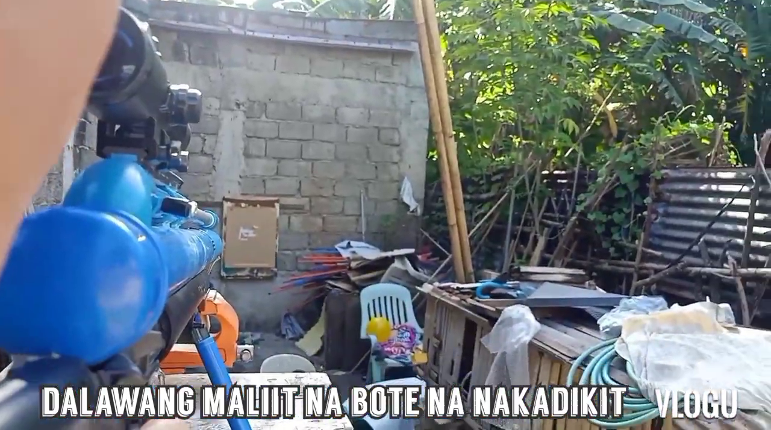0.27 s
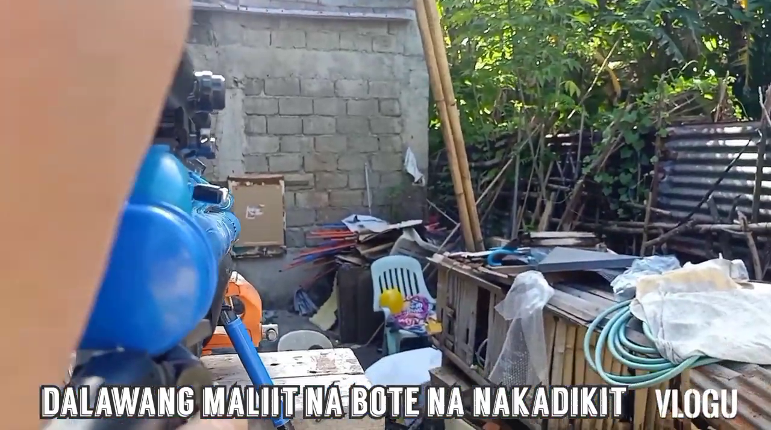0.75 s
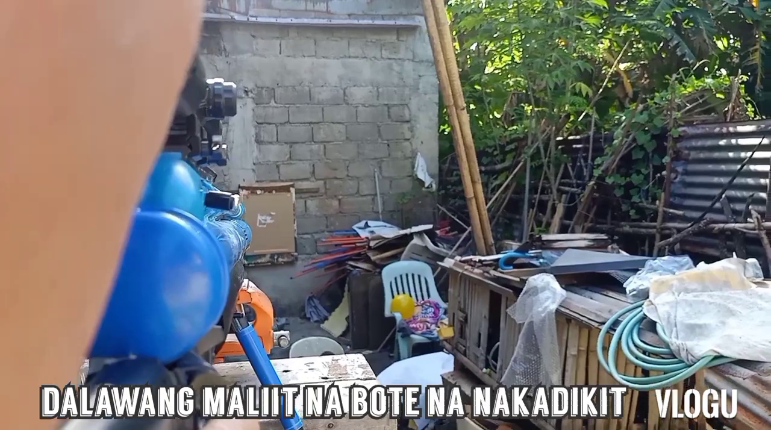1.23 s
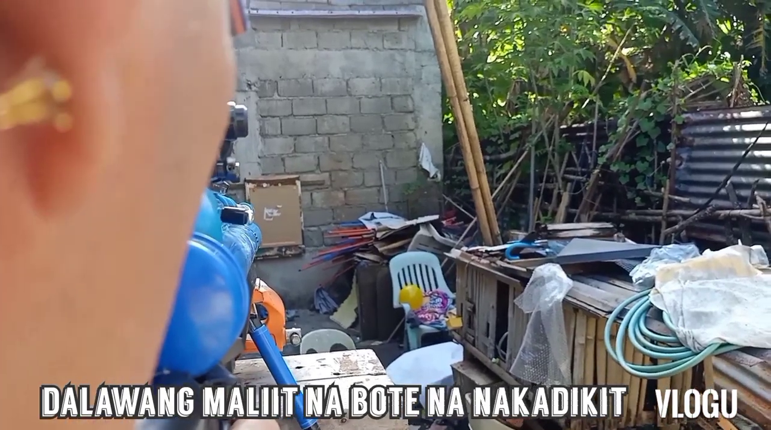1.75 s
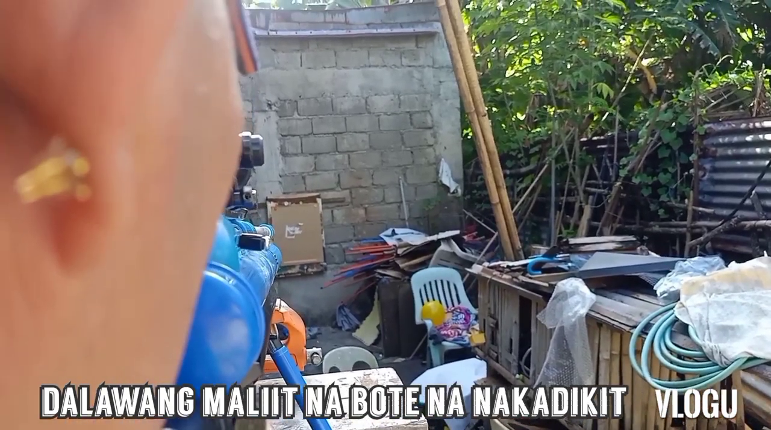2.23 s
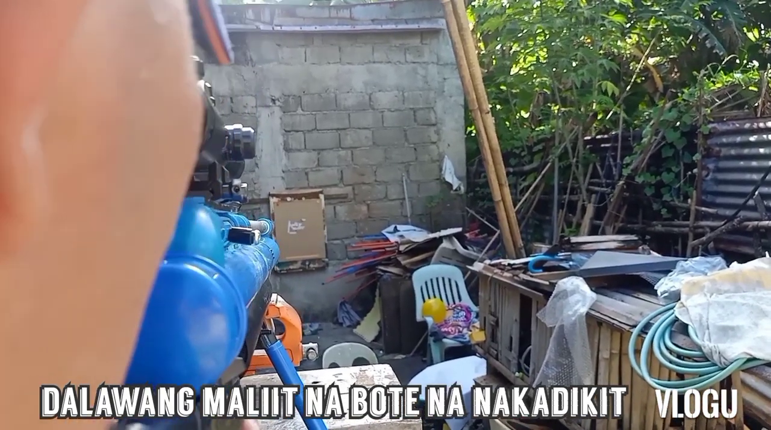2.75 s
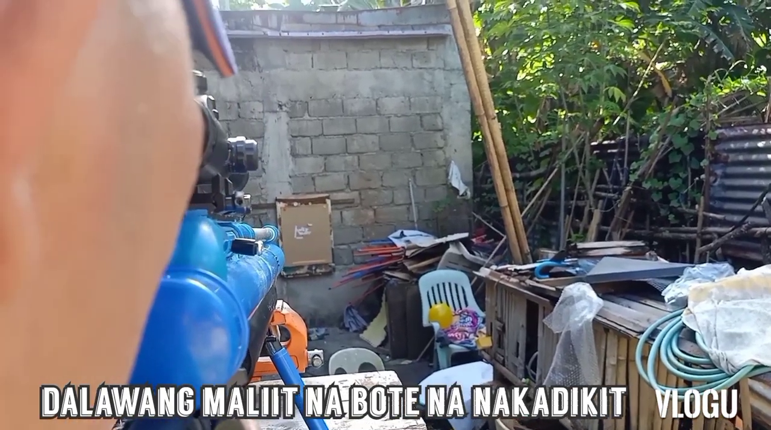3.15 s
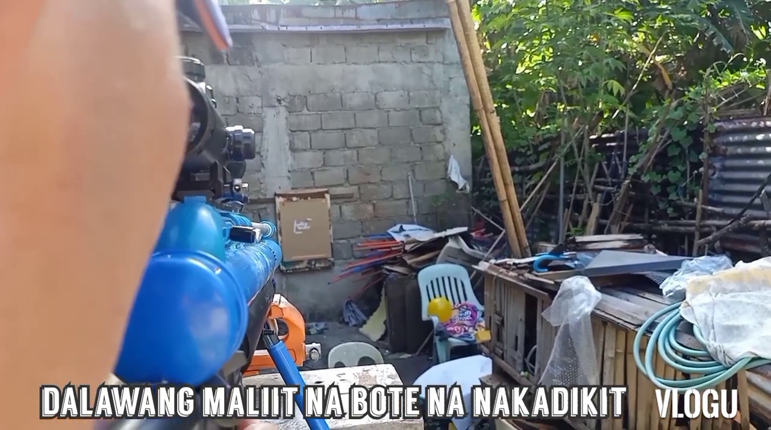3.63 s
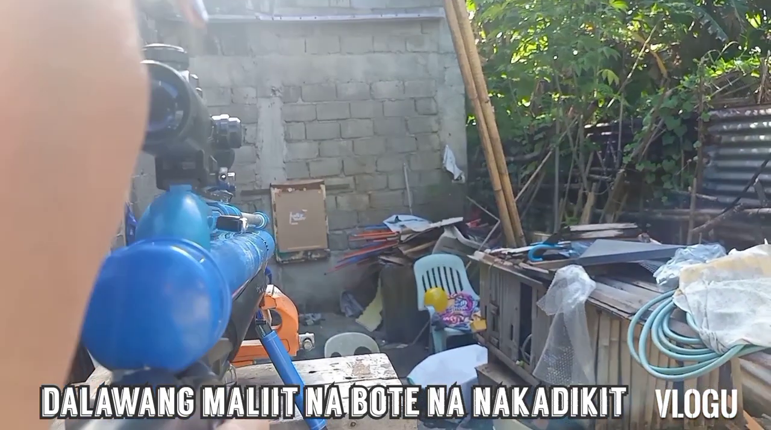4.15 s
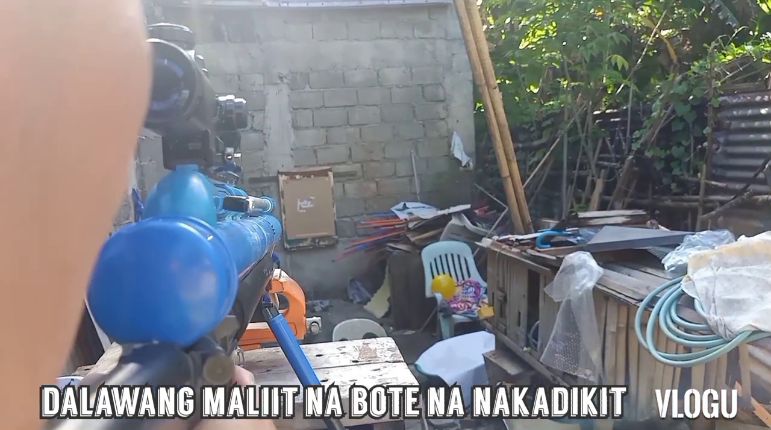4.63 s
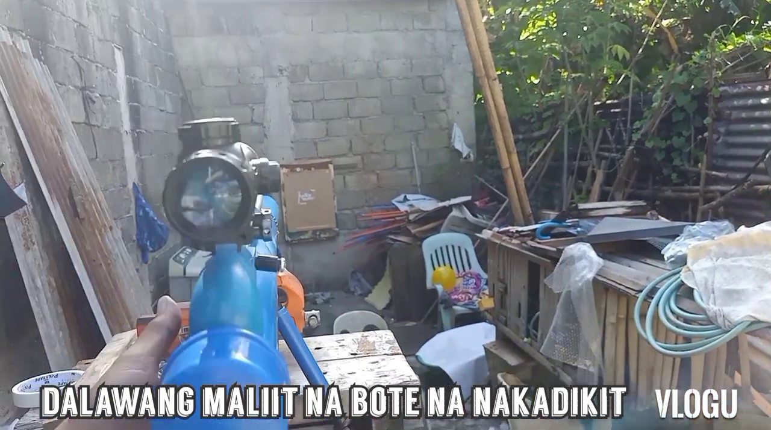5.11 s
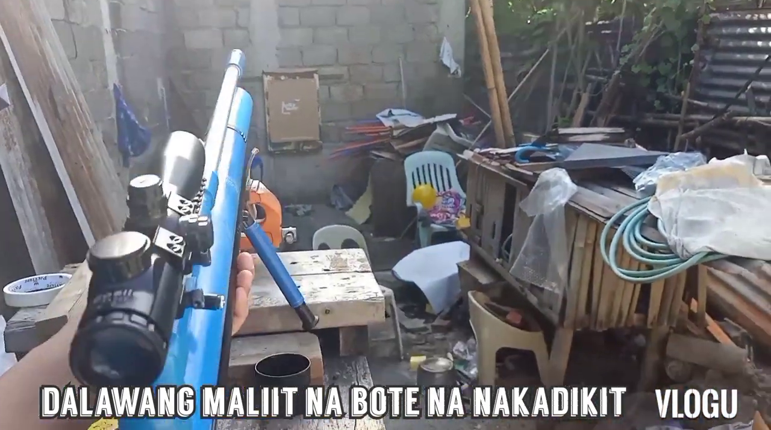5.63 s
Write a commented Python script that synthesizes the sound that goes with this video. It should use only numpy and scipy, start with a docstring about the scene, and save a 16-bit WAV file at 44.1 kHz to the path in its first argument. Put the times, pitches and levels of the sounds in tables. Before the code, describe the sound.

Close to a phone microphone in a small walled yard, a plastic gun ticks and clicks in the hands while a motor hums low and sparrows chirp. Just after two seconds a sharp crack and doubled bang overload the input, ringing briefly off the walls. Small hard things bounce and ping further off, the background turns very quiet, then handling clicks and scrapes return with a fainter drone.

```python
"""First a plastic pipe gun ticks in the hands, a motor drones and sparrows chirp around a small walled yard.
Then the homemade gun fires: bursts of noise make the muzzle crack and two strikes, and the yard rings.
Before and after, things knock, bounce and ping further off, built from dying noise and short tones.
Birds are sliding sines, the motor is a group of wavering tones, ticks are struck ringing tones.
The phone microphone overloads on the bang.
"""
import sys
import numpy as np
from scipy import signal
from scipy.fft import rfft, irfft
from scipy.io import wavfile
from scipy.ndimage import uniform_filter1d, map_coordinates

SR = 44100
rng = np.random.default_rng(int(sys.argv[2]) if len(sys.argv) > 2 else 0)


def digitize_waveform(pressure):
    """Quantize a signal to 16-bit integers and store it at the path in sys.argv[1].

    Rows of a 2-D input are taken as channels; values are limited to [-1, 1].
    """
    field = np.atleast_2d(pressure).T
    bounded = np.clip(field, -1, 1)
    quanta = np.round(bounded * 32767).astype(np.int16)
    wavfile.write(sys.argv[1], SR, quanta)


N = 258854
T = np.arange(N) / SR   # time of every sample, s

# Level of the background as heard through the microphone, lower after the bang:
# [t/s, hiss level/dB, far chatter level/dB]
FLOOR = [(0, -61, -65), (1.2, -63, -61.5), (2.3, -60.5, -64), (2.8, -65.5, -65.5), (3.25, -61, -70),
         (3.35, -68.5, -72), (3.9, -69, -72.5), (4.25, -70, -69), (4.5, -69.5, -81), (5.0, -68.5, -71.5),
         (5.4, -68, -68.5), (5.87, -64.5, -69.5)]
# Tone colour of the low rumble: [f/Hz, relative level/dB]
RUMBLE = [(20, -32), (38, -28), (56, -3.5), (100, 0.5), (200, -2), (400, -5), (800, -11), (1400, -23.5),
          (3000, -53)]
# Tone colour of the leaves' hiss: [f/Hz, relative level/dB]
HISS = [(700, -19), (1500, -0.5), (2200, 2), (3300, 0.5), (4200, -5.5), (5500, -12.5), (7300, -1),
        (7900, -10), (8800, -35.5), (12000, -41.5), (16000, -47)]
# Steady insect song: [f/Hz, width of each of two filter passes/Hz, level over the hiss/dB]
INSECTS = [(3240, 170, -6), (7470, 220, -16.5), (8250, 230, -19.5)]
# Bands where far birds and insects chatter: [lowest f/Hz, highest f/Hz, notes per second/(1/s),
# note length/s, level of the faintest notes/dB]
CHATTER = [(1900, 3400, 60, .07, 0), (3500, 6000, 40, .05, -8), (6200, 7500, 60, .05, -5)]
TRAFFIC_DB, MOTOR_RUMBLE_DB = -65.5, -14   # the second is relative to the drone

# Loudness of the motor's drone over time: [t/s, level/dB]
DRONE = [(0, -42.5), (.44, -42.5), (.52, -49), (.62, -42), (1.04, -41), (1.1, -49.5), (1.18, -43),
         (1.55, -42.5), (1.66, -67), (4.5, -73.5), (4.58, -50.5), (5.08, -47), (5.44, -47.5), (5.5, -53),
         (5.56, -48), (5.77, -49), (5.87, -59)]
# Low tones of the motor: [f/Hz, pitch waver/Hz, relative level/dB]
DRONE_MODES = [(57.5, 6, -19), (93.5, 6.8, -10.5), (120.5, 2.56, 2.5), (148.6, 2.9, -4), (217, 4.6, -9)]
# The motor's upper tone is silent between these times: [start t/s, stop t/s]
OCTAVE_SILENT = (1.46, 4.72)
OCTAVE_HZ, OCTAVE_WAVER_HZ = 241, 2.5
OCTAVE_DB, OCTAVE_UNEVEN_DB, UNEVEN_DB = -8, 2, 0.5   # relative to the drone; spreads of its loudness

# Sparrow chirps, each a quick slide that levels off: [t/s, length/s, starting f/Hz, final f/Hz,
# time constant of the slide/s, level/dB, roughness/share of pitch]
CHIRPS = [(.16, 0.13, 6850, 4340, 0.033, -58.5, 0.0092), (.15, 0.059, 6700, 6540, 0.033, -54, 0.022),
          (.375, 0.059, 5830, 5100, 0.031, -53.5, 0.022), (.69, 0.11, 7180, 6070, 0.058, -54.5, 0.051),
          (.73, 0.1, 6860, 3920, 0.048, -58.5, 0.041), (.85, 0.079, 7950, 7360, 0.024, -57.5, .008),
          (.94, 0.033, 6830, 3970, 0.018, -53, 0.024), (1.07, 0.16, 4820, 3614, 0.076, -57, 0.037),
          (1.12, 0.13, 8870, 7520, 0.026, -56.5, 0.0099), (1.36, 0.078, 6000, 4620, 0.034, -56, 0.038),
          (1.42, 0.14, 8570, 7370, 0.036, -50.5, 0.0037), (1.49, 0.061, 6910, 4070, 0.075, -56, 0.026),
          (1.71, 0.13, 4920, 6580, 0.017, -47.5, 0.043), (1.95, .1, 7590, 6500, .06, -47.5, 0.029),
          (1.99, 0.12, 6400, 4580, 0.027, -60, 0.037), (2.04, 0.038, 6320, 6310, 0.022, -46.5, 0.0089),
          (2.23, 0.29, 6920, 5570, .04, -46, 0.024), (4.17, 0.14, 3300, 2901, 0.058, -63.5, .015),
          (4.18, 0.11, 2900, 2600, 0.051, -64, .015), (4.24, .16, 2460, 2040, .1, -70, 0.0148)]
# Faint, nearly steady whistles: [t/s, length/s, starting f/Hz, level/dB]
WHISTLES = [(1.286, 0.17, 2410, -56.5), (1.27, 0.056, 3400, -60), (1.53, 0.064, 3800, -62),
            (1.576, 0.21, 2500, -54.5), (1.575, 0.15, 3370, -57.5), (1.59, 0.21, 2966, -59.5),
            (2.027, 0.24, 2194, -52.5), (2.167, 0.18, 2200, -48), (3.571, 0.09, 1650, -65.5),
            (4.07, 0.09, 4300, -68), (4.072, 0.032, 3440, -62), (5.299, 0.44, 2330, -65)]
WHISTLE_DROOP, WHISTLE_ROUGH, WHISTLE_SLIDE_S = 0.0089, 0.0059, 0.1   # shares of pitch; time constant
# Echoes of the birds off the nearest walls: [delay/s, level/dB before the overall echo level is added]
ECHOES = [(.024, -9.5), (.047, -10.5), (.08, -15)]

# Dull thumps further off: [t/s, level/dB, centre f/Hz, width/octaves, rise/s, time to fall 60 dB/s]
THUMPS = [(.528, -35, 660, 0.23, 0.00087, 0.55), (1.701, -24, 515, 0.24, 0.012, .33),
          (5.116, -23, 191, 0.74, .024, 0.15)]
LOWER_RING, LOWER_RING_DB = 0.635, -2   # each thump rings lower too: share of its centre, relative level
THUMP_ECHOES_S, AFTER_ECHOES_DB_PER_S = 0.14, 196   # after this time each thump dies faster
# Small hard things that knock and bounce in the yard: [t/s, level/dB, centre f/Hz, time to fall 60 dB/s]
BOUNCES = [(2.019, -38.5, 2430, 0.086), (2.15, -35, 1970, 0.69), (2.777, -49, 5000, 0.15),
           (2.892, -41, 3550, 0.12), (3.077, -36.5, 2807, 0.23), (3.393, -45.5, 3000, 0.2),
           (3.795, -38.5, 2230, .16)]
BOUNCE_OCTAVES, BOUNCE_RISE_S = 1.7, .001
SKIRT_DB, SKIRT_DB_PER_OCTAVE = 8.5, 9   # beside its centre a knock falls off slowly
BRIGHT_EDGE_DB, BRIGHT_EDGE_T60_S = -29, .08   # relative to each bounce
# Something small and hard pings in the yard: [t/s, level/dB]
PINGS = [(3.393, -44), (3.692, -47), (3.761, -47)]
PING_HZ, PING_T60_S = 1880, 0.08

# Ticks of the gun in the hands, and two faint clicks at the start of pings (3.692 s and 3.761 s):
# [t/s, strike level/dB, strongest ring f/Hz, crack relative to strike/dB]
TICKS = [(0.01, -33.5, 1150, -10.5), (0.073, -34, 1110, -13.5), (0.136, -32.5, 1110, -14),
         (0.147, -29.5, 1670, -9.5), (0.358, -29, 1730, -14.5), (0.51, -28.5, 1040, -11),
         (1.016, -37.5, 2160, -10.5), (1.174, -35, 1450, -3), (1.357, -23.5, 1720, -11),
         (1.415, -41.5, 1730, 4.5), (1.498, -41, 1420, -15), (1.638, -37.5, 2440, -18),
         (2.032, -26, 1980, -15), (2.27, -30, 1657, -19), (3.692, -52, 1920, -4), (3.761, -51, 1910, -0.5),
         (4.743, -43.5, 757, -18), (4.76, -38, 720, -15), (4.786, -28.5, 1470, -11.5),
         (4.886, -33, 1720, -16), (5.048, -27.5, 1546, -15.5), (5.069, -32.5, 1530, -18),
         (5.089, -28, 1490, -15), (5.124, -28, 1220, -7), (5.216, -20.5, 1240, -14.5),
         (5.486, -45.5, 898, -7.5), (5.573, -40, 1026, -3.5), (5.598, -38, 920, -13),
         (5.687, -33.5, 812, -24)]
# Ringing tones (modes) of the gun: [f/Hz, relative level/dB, time to fall 60 dB/s]
GUN = [(710, 0, 0.045), (855, -1, .05), (1114, 5, 0.021), (1287.6, 3.5, 0.023), (1567, -2, 0.056),
       (1712, 9.5, 0.015), (2012, -2.5, 0.023), (2802, -12.5, 0.047), (3216, 3, 0.0154)]
OFF_RING_DB_PER_OCTAVE, OFF_RING_MOST_DB = 33.5, 14.5   # modes away from the ring are struck less
TAIL_DB, TAIL_HZ, TAIL_T60_S = -24, 1350, .25   # level relative to each strike
# The grip shifts and scrapes: [start t/s, stop t/s, level/dB]
SCRAPES = [(4.73, 4.819, -51), (5.02, 5.121, -40), (5.47, 5.52, -58), (5.57, 5.689, -56)]
SCRAPE_PER_S = 160   # average rate of tiny clicks
# Tone colour of the microphone: [f/Hz, relative level/dB]
MIC = [(20, -6.5), (100, 8), (1300, 1), (2300, 5.5), (3300, -0.5), (4500, -9.5), (6200, 2.5), (7500, -7),
       (9000, -21.5), (16000, -29)]

# The bang as muzzle crack, strike, second strike: [t/s, level/dB, time to fall 60 dB/s,
# hollow boom level/dB, time for the boom to fall 60 dB/s]
BANG = [(2.316, 10.5, 0.018, -9.5, 0.0067), (2.3517, 14, 0.18, 11.5, 0.076), (2.432, 2, 0.16, 1, .15)]
# Tone colour of the three bursts: [f/Hz, relative level/dB]
BANG_COLOUR = [(35, -55.5), (60, -17), (208, -8), (504, -9.5), (719, -12), (980, -15.5), (1600, -6),
               (2430, -4), (3470, -15), (6310, -22.5), (12000, -55), (15600, -84.5), (22000, -120)]
# Tone colour of the yard's ring: [f/Hz, relative level/dB]
YARD_COLOUR = [(35, -70), (60, -43), (142, -26.5), (527, -1.5), (719, -12), (803, -6), (1490, -8),
               (2430, -0.5), (4630, -23.5), (6310, -22), (12000, -60.5), (15600, -91), (22000, -120)]
YARD_DB, YARD_T60_S, YARD_END_S = -17, 0.57, 2.784
PUFF_DB, PUFF_HZ, PUFF_T60_S = -5, 80, .045   # air pushed out of the barrel
SIZZLE_DB, NEAR_SIZZLE_DB, SIZZLE_T60_S = -28, -36, .21   # after the strikes; after the muzzle crack

CLIP_TOP, CUTOFF_HZ, SELF_NOISE_DB = .69, 17050, -86   # overload ceiling; top cut; input hiss


def amp(db):
    """Turns decibels into a gain."""
    return 10 ** (np.asarray(db) / 20)


def rms_one(x):
    """Scales a sound to rms 1, an average strength of one."""
    return x / np.sqrt(np.mean(x ** 2) + 1e-20)


def in_time(rows):
    """Draws each column of a time table as a curve, sample by sample."""
    s, *columns = np.transpose(rows)
    return [np.interp(T, s, column) for column in columns]


def at_hz(points, hz):
    """Reads a tone-colour table between its points, on a log frequency axis."""
    table_hz, table_db = np.array(points)[:, 0], np.array(points)[:, 1]
    return np.interp(np.log(hz + 1), np.log(table_hz), table_db)


def coloured(db_of_hz, count):
    """Shapes white noise to the given spectrum and scales it to rms 1."""
    hz = np.arange(count // 2 + 1) * SR / count
    spectrum = rfft(rng.standard_normal(count)) * amp(db_of_hz(hz))
    return rms_one(irfft(spectrum, count))


def hump(centre_hz, db_per_octave_squared):
    """Noise with one broad hump that falls away on both sides of its centre."""
    return coloured(lambda hz: -db_per_octave_squared * np.log2((hz + 1) / centre_hz) ** 2, N)


def drift(rate):
    """Smooth random wandering through about rate new values a second, rms 1."""
    return rms_one(map_coordinates(rng.standard_normal(5000), [T * rate], order=3))


def fade(t, rise, t60):
    """Envelope that rises, then dies by 60 dB every t60 seconds; silent before zero."""
    t = np.maximum(t, 0)
    return (1 - np.exp(-t / max(rise, 1e-4))) * amp(-60 * t / t60)


def resonance(x, hz, width_hz):
    """Rings at one frequency: a two-pole filter with gain about 1 on its peak."""
    r = np.exp(-np.pi * width_hz / SR)
    top = [(1 - r * r) / 2, 0, -(1 - r * r) / 2]
    bottom = [1, -2 * r * np.cos(2 * np.pi * hz / SR), r * r]
    return signal.lfilter(top, bottom, x + 1e-18)


def chatter():
    """Many faint short notes at random, each drooping a little, with a rough, fluttering loudness."""
    out = np.zeros(N + SR)
    for from_hz, to_hz, per_s, length, db in CHATTER:
        t = T[:round(length * SR)]
        for when, pitch, size, droop in rng.random((400, 4))[:round(per_s * N / SR)]:
            hz = from_hz * (to_hz / from_hz) ** pitch
            cycles = hz * t * (1 - .015 * droop * t / length)
            note = np.sin(np.pi * t / length) * np.sin(2 * np.pi * cycles)
            out[round(when * N):][:len(t)] += amp(db + 12 * size) * note
    return rms_one(out[:N] * (1 + 0.55 * drift(90)))


def neighbourhood():
    """Far traffic and the motor's own rumble, leaves and insects as filtered noise, and chatter."""
    hiss_db, chatter_db = in_time(FLOOR)
    smooth_drone_db = uniform_filter1d(in_time(DRONE)[0], size=SR // 4)
    rumble_gain = amp(TRAFFIC_DB) + amp(MOTOR_RUMBLE_DB + smooth_drone_db)
    rumble = rumble_gain * amp(2.7 * drift(6.7)) * coloured(lambda hz: at_hz(RUMBLE, hz), N)
    white = rng.standard_normal(N)
    insects = np.zeros(N)
    for hz, width_hz, db in INSECTS:
        song = resonance(resonance(white, hz, width_hz), hz, width_hz)
        insects += amp(db) * rms_one(song)
    leaves = amp(1.5 * drift(12)) * coloured(lambda hz: at_hz(HISS, hz), N)
    return rumble + amp(hiss_db) * (leaves + insects) + amp(chatter_db) * chatter()


def wavering(hz, waver_hz):
    """A tone that wanders in pitch and throbs in loudness."""
    throb = amp(2.6 * drift(22))
    return throb * np.sin(2 * np.pi * np.cumsum(hz + waver_hz * drift(6.8)) / SR)


def drone():
    """An uneven motor that runs, almost vanishes and returns: wavering low tones on a bed of rumble."""
    level_db, = in_time(DRONE)
    tones = sum(amp(db) * wavering(hz, waver_hz) for hz, waver_hz, db in DRONE_MODES)
    body = rms_one(rms_one(tones) + amp(-12.5) * hump(140, 8))
    octave = rms_one(wavering(OCTAVE_HZ, OCTAVE_WAVER_HZ)) * amp(OCTAVE_DB + OCTAVE_UNEVEN_DB * drift(8))
    # the upper tone fades out and in over 19 ms
    silent = np.clip(np.minimum(T - OCTAVE_SILENT[0], OCTAVE_SILENT[1] - T) / 0.019, 0, 1)
    return amp(level_db) * (amp(UNEVEN_DB * drift(14)) * body + (1 - silent) * octave)


def birds(notes, echo_db):
    """Rough sines that slide to their last pitch, repeated by the walls and smeared by scattered echoes."""
    out, waver = np.zeros(N), drift(450)
    for s, length, from_hz, to_hz, slide, db, rough in notes:
        t = T - s
        hz = to_hz + (from_hz - to_hz) * np.exp(-np.clip(t, 0, length) / slide)
        hz = hz * (1 + rough * waver)
        swell = np.sin(np.pi * np.clip(t / length, 0, 1)) ** .6
        out += amp(db) * swell * np.sin(2 * np.pi * np.cumsum(hz) / SR)
    out = out * amp(3.7 * drift(65))
    echoes = rng.standard_normal(SR // 2) * fade(T[:SR // 2], .004, 0.45)
    echoes = amp(echo_db) * echoes / np.linalg.norm(echoes)
    for delay, db in ECHOES:
        echoes[round(delay * SR)] += amp(db + echo_db)
    return out + signal.fftconvolve(out, echoes)[:N]


def bird_calls():
    """Sparrow chirps, and faint whistles that droop slightly, each with echoes off the walls."""
    whistles = [(s, length, hz, hz * (1 - WHISTLE_DROOP), WHISTLE_SLIDE_S, db, WHISTLE_ROUGH)
                for s, length, hz, db in WHISTLES]
    return birds(CHIRPS, echo_db=-1) + birds(whistles, echo_db=-7.0)


def knocks():
    """Each knock arrives blurred by the walls: noise around its centre, dying away."""
    out, count = np.zeros(N + SR), SR // 2
    faster_end = amp(-AFTER_ECHOES_DB_PER_S * np.maximum(T[:count] - THUMP_ECHOES_S, 0))
    thumps = [(*row, faster_end) for row in THUMPS]
    thumps += [(s, db + LOWER_RING_DB, hz * LOWER_RING, *rest) for s, db, hz, *rest in thumps]
    bounces = [(s, db, hz, BOUNCE_OCTAVES, BOUNCE_RISE_S, t60, 1) for s, db, hz, t60 in BOUNCES]
    for s, db, centre_hz, octaves, rise, t60, ending in thumps + bounces:
        def colour(hz):
            off = np.abs(np.log2((hz + 1) / centre_hz))
            skirt = SKIRT_DB + SKIRT_DB_PER_OCTAVE * off
            return at_hz(MIC, hz) - np.minimum(6 * (off / octaves) ** 2, skirt)
        knock = coloured(colour, count) * fade(T[:count], rise, t60) * ending
        out[round(s * SR):][:count] += amp(db) * knock
    edge = sum(amp(db + BRIGHT_EDGE_DB) * fade(T - s, BOUNCE_RISE_S, BRIGHT_EDGE_T60_S)
               for s, db, *_ in BOUNCES)
    out[:N] += edge * np.diff(rng.standard_normal(N + 1))   # differences make the noise bright
    out = signal.sosfilt(signal.butter(2, 80, "high", fs=SR, output="sos"), out)
    return out[:N] * amp(1.2 * drift(70))   # separate echoes make the decay ragged


def pings():
    """One short clear ring for each ping: a single dying sine."""
    return sum(amp(db) * fade(T - s, 0.0013, PING_T60_S) * np.sin(2 * np.pi * PING_HZ * (T - s))
               for s, db in PINGS)


def ticks():
    """A tick strikes all the gun's modes, mostly those near its ring, with a crack and a tail off the walls."""
    s, db, ring_hz, crack_db = np.transpose(TICKS)
    at, out = np.round(s * SR).astype(int), np.zeros(N)
    chance = rng.standard_normal((len(at), len(GUN)))
    scrape = sum(amp(d) * np.sin(np.pi * np.clip((T - start) / (stop - start), 0, 1))
                 for start, stop, d in SCRAPES)
    scrape = scrape * (rng.random(N) < SCRAPE_PER_S / SR)   # sparse random clicks
    for k, (hz, mode_db, t60) in enumerate(GUN):
        octaves_off = np.abs(np.log2(hz / ring_hz))
        near_db = -np.minimum(OFF_RING_DB_PER_OCTAVE * octaves_off, OFF_RING_MOST_DB)
        clicks = amp(mode_db) * scrape * rng.standard_normal(N)
        clicks[at] = amp(db + mode_db + near_db + 2.5 * chance[:, k])
        t = T[:SR // 8]
        swell = fade(t, .002, t60)   # plastic gives a little before it rings
        ring = swell * np.sin(2 * np.pi * (hz * t + rng.random()))
        out += signal.fftconvolve(clicks, ring)[:N]
    crack = sum(amp(d) * fade(T - t0, 0.00013, 0.04) for t0, d in zip(s, db + crack_db))
    tail = sum(amp(d) * fade(T - t0, 0.0039, TAIL_T60_S) for t0, d in zip(s, db + TAIL_DB))
    out = out + crack * coloured(lambda hz: at_hz(MIC, hz), N)
    out = out + tail * coloured(lambda hz: at_hz(MIC, hz) - 7 * np.log2((hz + 1) / TAIL_HZ) ** 2, N)
    return signal.sosfilt(signal.butter(4, 600, "high", fs=SR, output="sos"), out)


def bang():
    """Three bursts of dense lumpy noise, the yard's ring after the strikes, and the puff of air."""
    s, level_db, t60, boom_db, boom_t60 = np.array(BANG).T[:, :, None]
    noise = coloured(lambda hz: at_hz(BANG_COLOUR, hz), N) * amp(2.0 * drift(200) + 2.7 * drift(60))
    direct = np.sum(amp(level_db) * fade(T - s, 0.00082, t60), axis=0)
    near = amp(-23.5) * fade(T - s[0], 0.0027, 0.25)   # walls close to the muzzle
    boom = hump(650, 9) * np.sum(amp(boom_db) * fade(T - s, .0006, boom_t60), axis=0)
    ring = np.sum(amp(YARD_DB) * fade(T - s[1:], .01, YARD_T60_S), axis=0)
    # the ring is cut off quickly after YARD_END_S
    ring = ring * amp(-150 * np.maximum(T - YARD_END_S, 0) + 1.6 * drift(90))
    yard = ring * coloured(lambda hz: at_hz(YARD_COLOUR, hz), N)
    t = np.maximum(T - s[0], 0)
    puff = -amp(PUFF_DB) * fade(t, .002, PUFF_T60_S) * np.sin(2 * np.pi * PUFF_HZ * t)
    thud = amp(-6.5) * fade(T - s[1], .005, 0.28) * hump(155, 18)
    band = signal.butter(1, [5500, 14000], "band", fs=SR, output="sos")
    bright = signal.sosfilt(band, rng.standard_normal(N))
    scatter = np.sum(amp(SIZZLE_DB) * fade(T - s[1:], .002, SIZZLE_T60_S), axis=0)
    near_scatter = amp(NEAR_SIZZLE_DB) * fade(T - s[0], .003, SIZZLE_T60_S)
    sizzle = bright * (scatter + near_scatter)
    return noise * (direct + near) + boom + yard + puff + thud + sizzle


def scene():
    """Adds all sources at one microphone."""
    background = neighbourhood() + drone() + bird_calls()
    return (background + knocks() + pings() + ticks() + bang())[None]


def record(dry):
    """The input overloads almost squarely, edges a little rounded, over its faint hiss; then the top is cut."""
    clipped = dry / (1 + np.abs(dry / CLIP_TOP) ** 6) ** (1 / 6)
    rounded = signal.sosfilt(signal.butter(1, 13000, fs=SR, output="sos"), clipped)
    rounded = rounded + amp(SELF_NOISE_DB) * rng.standard_normal(N)
    return signal.sosfilt(signal.cheby2(10, 60, CUTOFF_HZ, fs=SR, output="sos"), rounded)


dry = scene()
out = record(dry)
digitize_waveform(out)
```